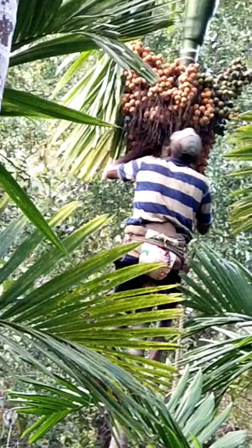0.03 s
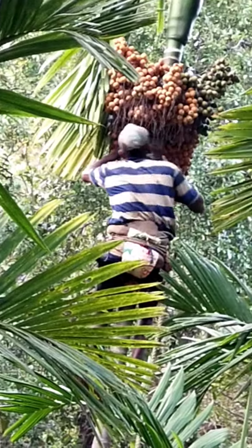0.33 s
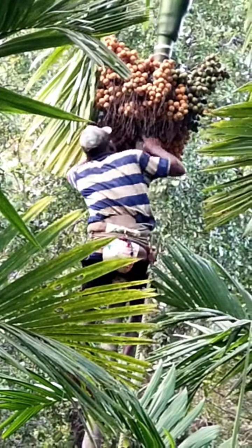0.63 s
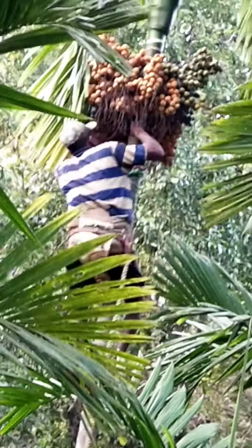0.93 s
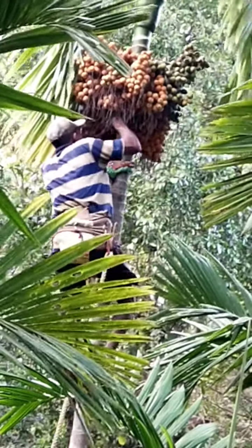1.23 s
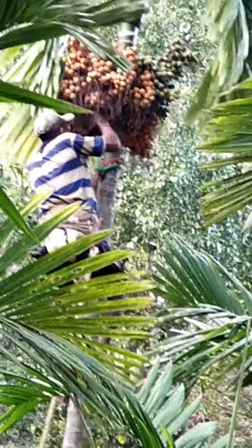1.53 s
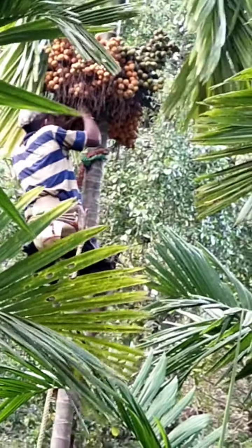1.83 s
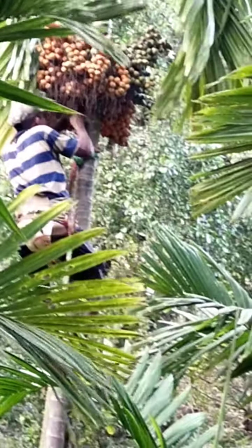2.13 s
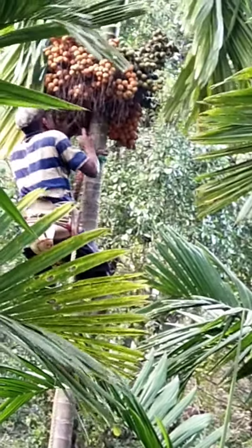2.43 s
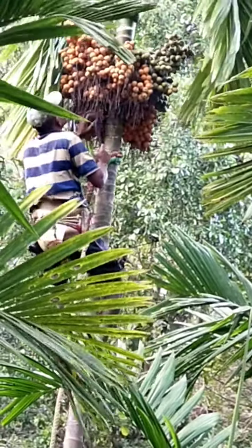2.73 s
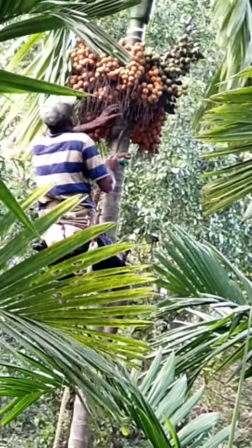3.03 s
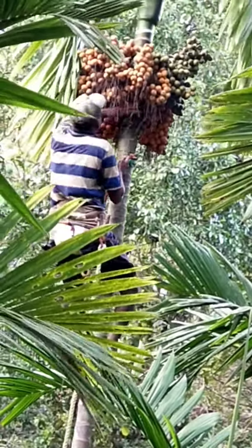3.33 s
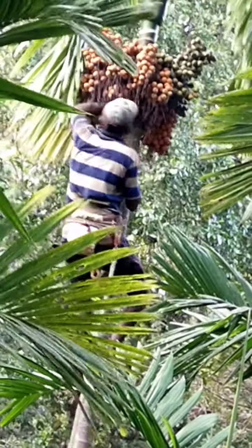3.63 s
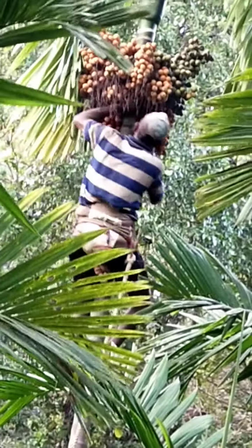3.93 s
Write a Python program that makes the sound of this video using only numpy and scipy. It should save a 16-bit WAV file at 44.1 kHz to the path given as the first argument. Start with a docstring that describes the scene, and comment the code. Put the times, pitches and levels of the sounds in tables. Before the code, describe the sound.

Dry palm fronds crackle and snap in uneven bursts as a climber rubs and scuffs against the trunk. A cricket starts chirping on the left over a steady high outdoor hiss, and two soft knocks come near the end.

```python
"""Dry palm fronds crackle and snap as a climber pushes through them, shifting round the trunk.
The leaflets tick in clumps of tiny noise bursts, stiff fruit stalks catch and slip, feet and cloth
rub and scuff on the trunk, and the bending palm creaks faintly. A cricket chirps on the left, four
whistling wing strokes at a time, over a steady high hiss and a low murmur of air.
Two soft knocks come on the right near the end."""
import sys
import numpy as np
from scipy import signal
from scipy.fft import rfft, irfft
from scipy.io import wavfile

SR = 44100
rng = np.random.default_rng(int(sys.argv[2]) if len(sys.argv) > 2 else 0)


def materialize(psi):
    """Save the field psi as 16-bit PCM at rate SR to the path in sys.argv[1].

    A 1-D psi becomes a single channel; in a 2-D psi each row is a channel.
    """
    bounded = np.clip(np.atleast_2d(psi).T, -1, 1)
    quanta = np.round(bounded * 32767).astype(np.int16)
    wavfile.write(sys.argv[1], SR, quanta)


N = 176400
T = np.arange(N) / SR


def amp(db):
    """Decibels to gain."""
    return 10 ** (np.asarray(db) / 20)


def unit(x):
    """Scales to rms 1."""
    return x / np.sqrt(np.mean(x ** 2) + 1e-20)


def curve_at(points, hz):
    """Reads a curve on a log-frequency axis."""
    point_hz, value = np.transpose(points)
    return np.interp(np.log(hz + 1), np.log(point_hz + 1), value)


def fader(points):
    """Gain over time from rows of time_s, level_db."""
    return amp(np.interp(T, *np.transpose(points)))


def add(mix, start_s, sound):
    """Drops a stereo sound into the mix."""
    part = mix[:, max(round(start_s * SR), 0):][:, :sound.shape[1]]
    part += sound[:, :part.shape[1]]


def pan(lean_db):
    """Left and right gains; positive leans left."""
    return amp([[lean_db / 2], [-lean_db / 2]])


def wander(rate_hz):
    """Smooth random movement of rms 1, mostly slower than rate_hz."""
    hz = np.fft.rfftfreq(N, 1 / SR)
    return unit(irfft(rfft(rng.standard_normal(N)) / (1 + (hz / rate_hz) ** 4), N))


def colour(x, eq, size=4096):
    """Rings x through a minimum-phase EQ with rows of freq_hz, gain_db."""
    log_gain = np.log(amp(curve_at(eq, abs(np.fft.fftfreq(size, 1 / SR)))))
    taps = np.fft.ifft(np.exp(np.conj(signal.hilbert(log_gain)))).real[:size // 2]
    return signal.oaconvolve(x, taps[None], axes=1)[:, :x.shape[1]]


# The scene's lean to the left: freq_hz, left_over_right_db
SCENE_LEAN = [(60, 1), (200, 1.4), (400, 1.5), (700, 3.5), (1400, 6.5), (1800, 5.5), (2400, -.5),
              (3500, 0.1), (5500, 5.1), (7000, 2.5), (9000, 5), (11300, 2), (14000, 10)]
# How alike the two sides are: freq_hz, correlation
LIKENESS = [(60, 0.45), (130, 0.91), (290, 0.86), (640, 0.68), (1400, 0.12), (3100, 0.14), (6800, 0.084),
            (15000, 0.057)]

def place(x, lean=SCENE_LEAN):
    """Makes two unrelated channels partly alike and leans them left; their average has rms 1."""
    hz = np.fft.rfftfreq(N, 1 / SR)
    left, unrelated = rfft(x)
    alike = curve_at(LIKENESS, hz)
    right = alike * left + np.sqrt(1 - alike ** 2) * unrelated
    side_gain = amp(curve_at(lean, hz) / 2)
    out = irfft(np.array([left * side_gain, right / side_gain]), N)
    return out / np.std(out.mean(0))


def crackle(per_s, spread_db, grain_s, wash_db, clump_db, clump_hz):
    """Clumps of tiny bursts of uneven size over the wash of many fainter ones."""
    sizes = amp(spread_db * np.minimum(rng.exponential(1, N), 4))
    hits = sizes * (rng.random(N) < per_s / SR)
    power = signal.lfilter([1], [1, -np.exp(-2 / (grain_s * SR))], hits ** 2)
    envelope = np.sqrt(power / power.mean() + amp(wash_db) ** 2) * amp(clump_db * wander(clump_hz))
    return unit(envelope * rng.standard_normal((2, N)))


def flutter(x, depth_db, patch_hz, patch_s):
    """Makes the tone flicker: brief random patches of the spectrum swell and dip."""
    spectra = signal.stft(x, nperseg=512, noverlap=384)[2]
    _, bins, frames = spectra.shape
    across = np.fft.fftfreq(bins, SR / 512)[:, None] * patch_hz
    along = np.fft.fftfreq(frames, 128 / SR) * patch_s
    smoothing = np.exp(-across ** 2 - along ** 2)
    patches = unit(np.fft.ifft2(np.fft.fft2(rng.standard_normal((bins, frames))) * smoothing).real)
    return unit(signal.istft(spectra * amp(depth_db * patches), nperseg=512, noverlap=384)[1][:, :N])


def leaflet_ticks(per_s, spread_db, ring_s):
    """Ticks of uneven size; each leaflet rings briefly at a pitch of its own."""
    onsets, age = np.flatnonzero(rng.random(N) < per_s / SR), np.arange(700)
    size = amp(spread_db * np.minimum(rng.exponential(1, N), 3))[onsets, None]
    pitch_hz = rng.uniform(2500, 15500, N)[onsets, None]
    phase = rng.random((2, N))[:, onsets, None]
    rings = size * np.exp(-age / SR / ring_s) * np.sin(2 * np.pi * (pitch_hz * age / SR + phase))
    samples = (onsets[:, None] + age).ravel()
    return unit(np.array([np.bincount(samples, side.ravel(), N)[:N] for side in rings]))


# How hard the dry leaflets are stirred: time_s, level_db
RUSTLE_FADER = [(0, -21.5), (.13, -28), (.31, -22.5), (.63, -23), (.85, -24.5), (.92, -19.5), (.98, -16),
                (1.05, -18.5), (1.16, -30), (1.24, -22), (1.28, -29), (1.42, -30), (1.55, -36.5),
                (1.595, -29), (1.66, -32), (1.735, -22.5), (1.77, -26), (1.93, -39.5), (2.07, -41),
                (2.15, -24), (2.35, -42.5), (2.42, -31), (2.54, -43), (2.62, -26.5), (2.84, -20),
                (3.01, -38.5), (3.24, -39.5), (3.45, -39.5), (3.66, -43), (3.69, -32), (4.0, -51)]
# Crisp top, with the microphone's ring near 7.5 kHz: freq_hz, gain_db
RUSTLE_EQ = [(1000, -60), (2500, -22), (3800, -15), (5300, -10), (6600, -5.5), (7650, 1.5), (8300, -4),
             (9500, -9), (11800, -15), (13600, -12.5), (16000, -14.5)]

def leaf_rustle():
    """Dry leaflets tick against each other with a bright ring."""
    grain = crackle(per_s=900, spread_db=3.0, grain_s=0.00082, wash_db=0, clump_db=1.38, clump_hz=39.6)
    grain = flutter(grain, depth_db=2.0, patch_hz=200, patch_s=0.09)
    ticks = amp(-7.0) * leaflet_ticks(per_s=2700, spread_db=1.5, ring_s=0.0042)
    return amp(-1.1) * fader(RUSTLE_FADER) * place(colour(grain + ticks, RUSTLE_EQ))


# How hard the stalks scrape: time_s, level_db
SCRAPE_FADER = [(0, -36), (.12, -35), (.27, -34), (.29, -24.5), (.32, -30.5), (.58, -37), (.63, -33),
                (.83, -39), (.98, -29), (1.06, -31.5), (1.16, -42), (1.25, -36), (1.56, -52.5), (1.61, -43),
                (1.68, -42), (1.74, -37), (1.81, -40.5), (2.06, -56.5), (2.1, -40), (2.15, -33.5),
                (2.35, -49.5), (2.48, -44), (2.6, -42), (2.84, -34.5), (3.02, -60.5), (3.35, -61),
                (3.47, -51), (3.62, -53.5), (3.75, -44.5), (3.86, -50.5), (4.0, -56.5)]
# Broad midrange rasp: freq_hz, gain_db
SCRAPE_EQ = [(200, -23.5), (480, -12.5), (740, -7), (1000, -3), (1400, -1), (1750, -0.5), (2050, -1),
             (3300, -2), (5000, -3), (9000, -22)]

def stalk_scrape():
    """Stiff stalks catch and slip with a coarser grain."""
    slips = crackle(per_s=390, spread_db=1.0, grain_s=0.0017, wash_db=2.5, clump_db=1.17, clump_hz=29.4)
    slips = flutter(slips, depth_db=3.0, patch_hz=248, patch_s=0.044)
    return amp(0.16) * fader(SCRAPE_FADER) * place(colour(slips, SCRAPE_EQ))


# How hard the climber rubs the trunk: time_s, level_db
RUB_FADER = [(0, -39.5), (.2, -41.5), (.32, -39.5), (.53, -46.5), (.86, -49), (.97, -40), (1.11, -47.5),
             (1.42, -51.5), (1.5, -43.5), (1.68, -47), (1.73, -42), (1.84, -44), (2.07, -55.5),
             (2.3, -57.5), (2.46, -48.5), (2.62, -49.5), (2.75, -43.5), (2.88, -43.5), (2.99, -69),
             (3.08, -67), (3.115, -48), (3.2, -57), (3.3, -70), (3.4, -65), (3.47, -54.5), (3.7, -57),
             (3.83, -48), (3.92, -59), (4.0, -60)]
# Muffled low-mid body: freq_hz, gain_db
RUB_EQ = [(25, -31), (60, -33.5), (130, -3.5), (230, -1.5), (330, -3), (450, -0.5), (750, 3.5),
          (1100, -5.5), (2500, -31.5)]

def trunk_rub():
    """Feet and cloth rub along the trunk with a dull, grainy friction."""
    grain = crackle(per_s=240, spread_db=2.5, grain_s=0.0031, wash_db=1.5, clump_db=2.0, clump_hz=45)
    grain = flutter(grain, depth_db=2.5, patch_hz=148, patch_s=0.15)
    return amp(-1.0) * fader(RUB_FADER) * place(colour(grain, RUB_EQ))


# A high band of hiss: freq_hz, gain_db
HISS_EQ = [(1500, -28), (3000, -20.5), (5000, -34), (6500, 1), (7500, 8), (8500, 2.5), (10500, -17),
           (15000, -22.5)]
# The hiss sits to the left: freq_hz, left_over_right_db
HISS_LEAN = [(2000, 2.4), (4400, 15), (8100, 5.4), (14000, 35)]

def high_hiss():
    """A steady, shimmering high hiss, ringing in the microphone near 7.5 kHz, leaning left."""
    hiss = flutter(rng.standard_normal((2, N)), depth_db=4.2, patch_hz=200, patch_s=0.04)
    return amp(-38.0) * place(colour(hiss, HISS_EQ), HISS_LEAN)


# Rumble, a soft middle and a thin top: freq_hz, gain_db
AIR_EQ = [(20, -24), (65, 1), (125, 0), (200, -12), (400, -17), (700, -3), (1400, -39), (3000, -20),
          (8000, -8.5)]

def air_bed():
    """Air murmurs and hisses faintly under everything."""
    return amp(-58.0) * place(colour(rng.standard_normal((2, N)), AIR_EQ))


# Sharp snaps of dry leaf: start_s, level_db, boost_db (half is applied), tilt_db_per_octave
SNAP_CUES = [(.0468, -5.5, 3, -2), (.2828, -4, 3, 0), (.3763, -7, 4, 2), (.6275, -4.5, 5, -2),
             (.634, -6, 4, -1), (.7628, -3, 3, 0), (.925, -7, 5, 1), (.9643, 0, 2, -1), (.972, -6, 3.5, 0),
             (1.1358, -12, 3, 3), (1.69, -10, 5, 4), (1.7225, -8, 5, 2), (2.7242, -3.5, 8, 4),
             (2.848, -8, 5.5, 0), (3.058, -8.5, 11, -3), (3.318, -9.5, 9.5, 2)]
# Thin, ringing crack: freq_hz, gain_db
SNAP_EQ = [(1500, -44), (3700, -4.5), (5000, -18.5), (7400, 13), (8700, 7.5), (11000, -8), (14500, -4.5)]

def leaf_snaps(decay_s=0.0012):
    """Single leaflets crack, hard left: a thin, high burst that sets the microphone ringing."""
    out, t = np.zeros((2, N)), np.arange(1024) / SR
    left_only = np.array([[1], [0]])
    for start_s, level_db, boost_db, tilt in SNAP_CUES:
        tilted_eq = [(hz, gain_db + tilt * np.log2(hz)) for hz, gain_db in SNAP_EQ]
        burst = rng.standard_normal((1, len(t))) * np.exp(-(t / decay_s) ** 2)
        crack = colour(burst, tilted_eq)
        add(out, start_s, left_only * amp(level_db + boost_db / 2) * crack / abs(crack).max())
    return out


# Short, harder scuffs on the trunk: start_s, length_s, level_db
SCUFF_CUES = [(0.182, 0.018, -29.5), (0.21, 0.04, -28.5), (0.284, 0.062, -38), (0.953, 0.032, -30),
              (1.481, .02, -43), (1.592, 0.049, -33), (2.561, .01, -39.5), (2.778, 0.022, -37)]
# Dull, hollow tone: freq_hz, gain_db
SCUFF_EQ = [(60, -37), (150, -15), (240, 4), (450, -13), (760, 4.5), (1100, -2.5), (1750, -11),
            (3000, -13.5)]

def scuffs():
    """A foot or a frond base scuffs: noise with a fast attack and a slower release."""
    push = np.zeros(N)
    for start_s, length_s, level_db in SCUFF_CUES:
        progress = np.clip((T - start_s) / length_s, 0, 1)
        push += amp(level_db) * np.sin(np.pi * progress ** 0.31)
    return push * place(colour(rng.standard_normal((2, N)), SCUFF_EQ))


# The cricket's chirps: start_s
CHIRP_CUES = [1.274, 1.403, 1.529, 1.651, 1.776, 1.9, 2.025, 2.145, 2.265, 2.387, 2.502, 2.625, 2.742,
              2.863, 2.988, 3.103, 3.225, 3.345, 3.461, 3.575, 3.69, 3.805, 3.927]
# The four wing strokes of a chirp: level_db
STROKE_ACCENTS = [-12.5, -5.5, -5, -2.5]
# The song gains strength: time_s, level_db
CRICKET_FADER = [(1.3, -7), (2.9, -2.1)]

def cricket(pitch_hz=5983, sag_hz_per_s=22800, stroke_s=0.021, spacing_s=0.018, tail_t60_s=0.22):
    """Each wing stroke is a short whistle that sags in pitch; the trees scatter it into a faint tail."""
    song, t = np.zeros((2, N)), np.arange(0, stroke_s, 1 / SR)
    swell = np.sin(np.pi * t / stroke_s) ** 3.7
    for start_s, effort_db in zip(CHIRP_CUES, rng.standard_normal(len(CHIRP_CUES))):
        for k, accent_db in enumerate(STROKE_ACCENTS):
            detune, force_db = rng.standard_normal(2)
            hz = pitch_hz + 25 * detune - sag_hz_per_s * t
            whistle = swell * np.sin(2 * np.pi * np.cumsum(hz) / SR)
            gain = amp(-30.5 + effort_db + accent_db + force_db)
            add(song, start_s + k * spacing_s, pan(lean_db=23.9) * gain * whistle)
    scatter = rng.standard_normal((2, SR)) * amp(-60 * T[:SR] / tail_t60_s)
    tail = signal.oaconvolve(song, scatter / np.linalg.norm(scatter[0]), axes=1)[:, :N]
    return (song + amp(-8) * tail) * fader(CRICKET_FADER)


# Creaks of the bending palm: start_s, length_s, start_hz, end_hz, peak_db
CREAK_CUES = [(1.61, 0.084, 120, 128, -50), (1.8, 0.24, 129, 126, -57.5), (2.38, 0.163, 617, 549, -51),
              (2.505, 0.32, 461, 384, -47.5)]

def palm_creaks():
    """The palm bends with faint, unsteady gliding tones."""
    out, waver = np.zeros((2, N)), wander(rate_hz=67)
    for start_s, length_s, start_hz, end_hz, peak_db in CREAK_CUES:
        progress = np.clip((T - start_s) / length_s, 0, 1)
        hz = (start_hz + (end_hz - start_hz) * progress) * (1 + .04 * waver)
        out += amp(peak_db) * np.sin(np.pi * progress) * np.sin(2 * np.pi * np.cumsum(hz) / SR)
    return out


# Two soft knocks: start_s, ring_db, thud_db
KNOCK_CUES = [(3.4233, -27.5, -50), (3.6014, -20.5, -19)]
# The ring of a knock: pitch_hz, level_db, t60_s
KNOCK_MODES = [(357, 5.5, 0.011), (815, -3, 0.0096), (1110, -7.5, 0.0075), (1600, -15, .005)]

def knocks(thud_hz=124, thud_rise_s=0.00087, thud_t60_s=0.022):
    """Dull, close knocks on the right: a quickly damped ring over a low thud."""
    out, t = np.zeros((2, N)), np.arange(4096) / SR
    ring = sum(amp(db - 60 * t / t60_s) * np.sin(2 * np.pi * hz * t) for hz, db, t60_s in KNOCK_MODES)
    ring /= abs(ring).max()
    thud = (1 - np.exp(-t / thud_rise_s)) * amp(-60 * t / thud_t60_s) * np.sin(2 * np.pi * thud_hz * t)
    for start_s, ring_db, thud_db in KNOCK_CUES:
        add(out, start_s, pan(lean_db=-22) * (amp(ring_db) * ring + amp(thud_db) * thud))
    return colour(out, eq=[(20, -29), (100, -9.5), (1600, 0.5), (2600, -23)])


def scene():
    """The climber's movement and the background beds, with the spot effects on top."""
    textures = leaf_rustle() + stalk_scrape() + trunk_rub() + high_hiss() + air_bed()
    return textures + leaf_snaps() + scuffs() + cricket() + palm_creaks() + knocks()


def record(dry):
    """Clips at full scale, then cuts the highs above 15.7 kHz."""
    lowpass = signal.firwin(511, 15700, window=("kaiser", 9), fs=SR)
    return signal.oaconvolve(np.clip(dry, -1, 1), lowpass[None], "same")


dry = scene()
out = record(dry)
materialize(out)
```